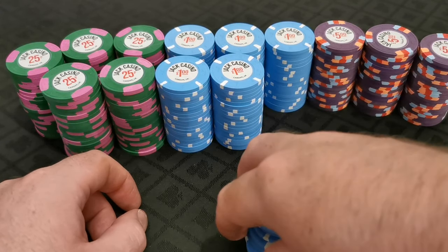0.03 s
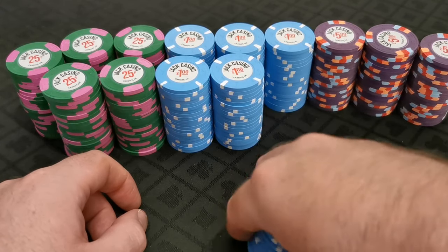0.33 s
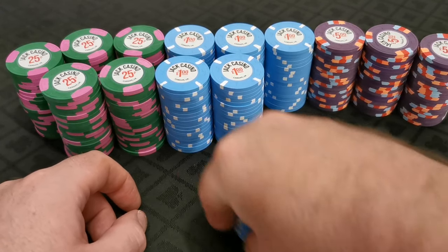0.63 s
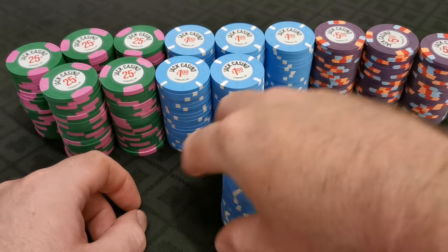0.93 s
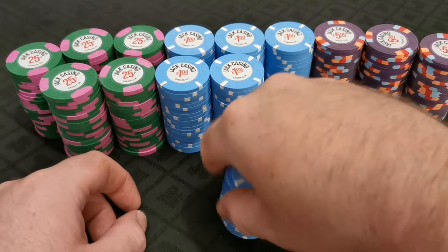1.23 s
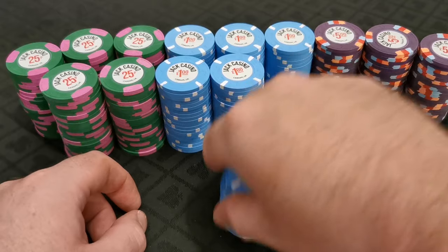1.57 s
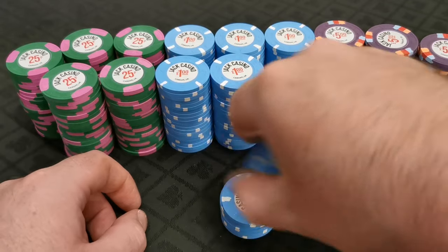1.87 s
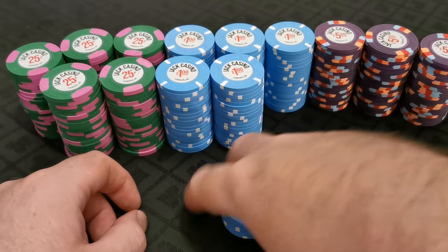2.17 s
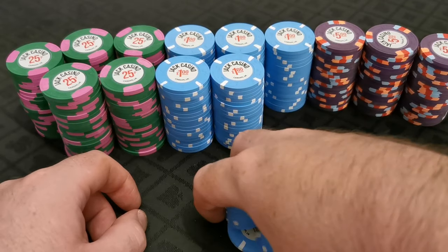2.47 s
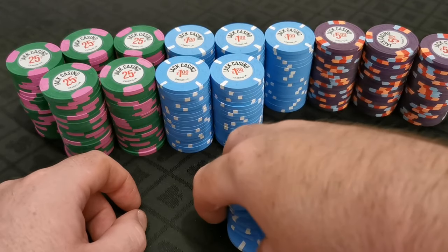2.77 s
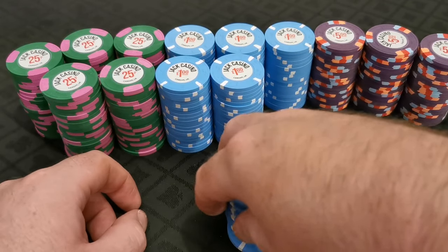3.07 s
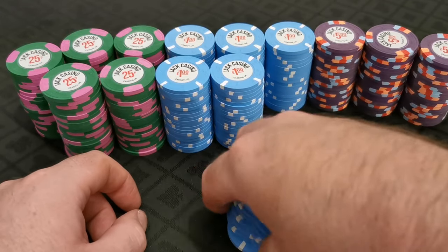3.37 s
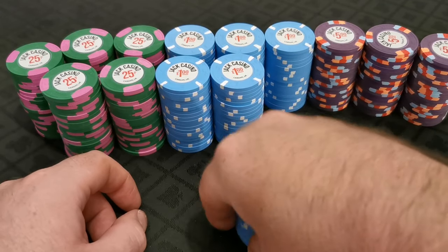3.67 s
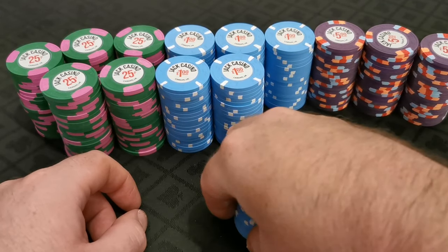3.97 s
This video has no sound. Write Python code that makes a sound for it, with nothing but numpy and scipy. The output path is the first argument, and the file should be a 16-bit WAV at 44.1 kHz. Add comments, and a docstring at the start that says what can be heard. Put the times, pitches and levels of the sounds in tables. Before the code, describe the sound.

Clay poker chips clicking and chattering as a hand cuts and restacks them on felt.

```python
"""Clay poker chips are cut and restacked by hand on a felt-covered table in a small room.
Each impact excites the damped modes of chip and stack: chips clack when they meet face to face
and chatter in many tiny impacts when they slide. Friction of fingers and felt gives bands of
noise, and a stack set down thumps the table. The room reverberates briefly over a faint hum."""
import sys
import numpy as np
from scipy import signal
from scipy.fft import rfft, irfft
from scipy.io import wavfile
from scipy.ndimage import uniform_filter1d

SR = 44100
rng = np.random.default_rng(int(sys.argv[2]) if len(sys.argv) > 2 else 0)


def wrap_up_sound(samples):
    """Save the sound to the file named by the first command line argument, as 16-bit audio."""
    columns = np.atleast_2d(samples).T
    # keep every value between -1 and 1, then stretch to whole-number steps
    tamed = np.clip(columns, -1, 1)
    steps = np.round(tamed * 32767).astype(np.int16)
    wavfile.write(sys.argv[1], SR, steps)


N = 176400
T = np.arange(N) / SR
TABLE_PAN_DB = -4  # pan is always left over right
# Spectrum of friction on felt. Each row: frequency in Hz, relative level in dB.
FELT_SPECTRUM = [(30, -10), (160, -12.5), (320, 0), (1200, -5), (16000, -65)]


def from_db(db):
    """Amplitude ratio of a level in decibels."""
    return 10 ** (np.asarray(db) / 20)


def unit_rms(x):
    """Normalisation to a mean power of one."""
    return x / np.sqrt(np.mean(x ** 2) + 1e-20)


def at_hz(points, hz):
    """Interpolation on a log-frequency axis."""
    p = np.array(points)
    return np.interp(np.log(np.maximum(hz, 1)), np.log(p[:, 0]), p[:, 1])


def panned(db):
    """Constant-power panning: left and right gains that differ by db."""
    return unit_rms(from_db([[db / 2], [-db / 2]]))


def add(out, start_s, x):
    """Superposition of x on out from start_s."""
    i = int(start_s * SR)
    x = x[:, max(-i, 0):N - i]
    out[:, max(i, 0):max(i, 0) + x.shape[1]] += x


def levelled(x, span_s):
    """Each channel gets the energy of a unit level held for span_s."""
    return x * np.sqrt(span_s * SR / (np.sum(x ** 2, axis=1, keepdims=True) + 1e-20))


def noise(spectrum):
    """Coloured stereo noise of unit rms, most coherent at long wavelengths."""
    # Each row: frequency in Hz, correlation of left and right.
    coherence = [(30, .95), (125, 0.63), (1000, 0.33), (3000, 0.039)]
    hz = np.arange(N // 2 + 1) * SR / N
    mid, side = rfft(rng.standard_normal((2, N)))
    alike = at_hz(coherence, hz)
    both = np.sqrt(1 + alike) * mid + np.sqrt(1 - alike) * side * [[1], [-1]]
    return unit_rms(irfft(both * from_db(at_hz(spectrum, hz)) * (hz > 15), N))


def stroke(start, peak, end, drop_db=16.5):
    """Exponential growth and decay of a movement, drop_db down at its ends, then faded out."""
    away = np.maximum((peak - T) / max(peak - start, .002), (T - peak) / max(end - peak, .002))
    return from_db(-drop_db * np.minimum(away, 2)) * np.clip((1.2 - away) * 5, 0, 1)


def ring(modes, pitch=1, detune=.025, scatter_db=2):
    """Coupled vibration: as a blow is passed along, each mode swells and then decays."""
    hz, db, swell_s = np.array(modes).T[:, :, None, None]
    count = len(modes)
    path_s = np.abs(rng.normal(0, .0001, (count, 2, 1)))  # each mode's own delay to each side
    t = np.maximum(np.arange(900) / SR - path_s, 0)
    hz = hz * pitch * (1 + detune * rng.standard_normal((count, 1, 1)))
    gain = from_db(db + scatter_db * rng.standard_normal((count, 2, 1))) / np.sqrt(swell_s)
    envelope = gain * t / swell_s * np.exp(-t / swell_s)
    return np.sum(envelope * np.sin(2 * np.pi * (hz * t + rng.random((count, 1, 1)))), axis=0)


def chip_sound(contacts, pitch, body_db, edge_db, pan_db):
    """Modal response: contacts excite the chip, its bright edge tones, the stack and a brief snap."""
    # Modes of chip, edge and stack. Each row: frequency in Hz, level in dB, swell time in seconds.
    chip_modes = [(4824, -6, 0.00033), (5160, -0.5, 0.00054), (5425, -9, 0.00043)]
    edge_modes = [(6360, -4.5, 0.00048), (8650, 0.5, 0.0002), (9570, -5, 0.00047), (10270, -9, 0.00061),
                  (10850, -2.5, 0.00062), (13000, -9.5, 0.000062)]
    stack_modes = [(824, -9, 0.00075), (1410, -9.5, 0.00024), (2210, -1.5, 0.00034), (2694, -9.5, 0.00017),
                   (3710, 0.5, 0.00023)]
    snap_decay_s, snap_above_hz = .0012, 2990
    grip_detune = .036  # overtones differ from chip to chip and with the grip

    def struck(response):
        return levelled(signal.fftconvolve(contacts[None], response, axes=1), span_s=.0013)

    main = ring(chip_modes, pitch)
    snap = rng.standard_normal(main.shape) * np.exp(-T[:main.shape[1]] / snap_decay_s)
    snap = signal.sosfilt(signal.butter(1, snap_above_hz, "high", fs=SR, output="sos"), snap)
    snap_db = -6.5 + (edge_db + body_db) / 2  # strongest for a hard blow on a whole stack
    chip = struck(main) + from_db(snap_db) * struck(snap)
    edge = from_db(edge_db) * struck(ring(edge_modes, detune=grip_detune))
    body = from_db(body_db) * struck(ring(stack_modes, detune=grip_detune))
    return chip * panned(pan_db) + edge * panned(pan_db / 2 - 6) + body * panned(pan_db / 2 - 5.5)


def slides(chips=5, catches_per_s=800, felt_db=-21.5):
    """Stick-slip friction: chips catch on each other in tiny knocks as the stack drags on felt."""
    # Each row: start, peak and end in seconds, level in dB, relative stack and edge levels in dB,
    # pan in dB.
    moves = [(-.03, 0.004, 0.021, -43.5, -11.5, -17, -5), (0.031, 0.084, 0.18, -38.5, -9.5, -8, -4),
             (0.182, .19, 0.23, -33.5, -15, -5, -4.5), (0.493, 0.507, 0.57, -38.5, -3.5, -7, 2.5),
             (.65, 0.661, .68, -46, 2, -5, -9), (2.718, 2.755, 3, -58.5, 5.5, -14, -23),
             (3.054, 3.077, 3.12, -40.5, -4.5, -7, -2), (3.326, 3.335, 3.35, -36, -19, -15, -1),
             (3.366, 3.38, 3.42, -41.5, -19, -10, 9), (3.546, 3.569, 3.613, -45, -8, -8.5, 1),
             (3.857, 3.886, 3.915, -33, -6, -5, -1)]
    out, drag = np.zeros((2, N)), np.zeros(N)
    for start, peak, end, db, body_db, edge_db, pan_db in moves:
        force = from_db(db) * stroke(start, peak, end, drop_db=9)
        moving = np.flatnonzero(force)
        chatter = 0
        for _ in range(chips):
            chance, size, sign = rng.random((3, N // 4))[:, :len(moving)]
            strength = from_db(-1.5 * np.log(size + .02)) * np.sign(sign - .5)
            catches = (chance < catches_per_s / chips / SR) * strength
            pitch = 1 + rng.normal(0, .049)
            chatter += chip_sound(catches, pitch, body_db, edge_db, pan_db)[:, :len(moving)]
        out[:, moving] += unit_rms(chatter) * force[moving]
        drag += force
    return out + from_db(felt_db) * drag * noise(FELT_SPECTRUM) * panned(TABLE_PAN_DB)


def clacks(rebounds_per_s=3000, rebound_db=-10, graze_db=-14, graze_s=.0016):
    """Impact with rebound: edges graze, the faces meet, and micro-contacts follow as a chip settles."""
    # Each row: time in seconds, level in dB, relative stack and edge levels in dB, pan in dB,
    # chatter length in milliseconds, ring frequency in Hz.
    impacts = [(0.0346, -26, -8.5, -8.5, 0.5, 3.7, 5020), (0.0441, -31, -21, 0.5, 6, 1.5, 5200),
               (0.0617, -26, -20.5, -2, 9, 2.5, 5330), (0.1003, -18.5, -15, -2.5, -4, 3.5, 5100),
               (0.1564, -28.5, -14, -4, -1, 1.8, 5040), (.168, -25.5, -10.5, -7.5, -7, 2, 5230),
               (.1844, -21.5, -20, -12, 12, .8, 5180), (0.1973, -26, -15.5, 2, -8.5, 3, 5430),
               (0.3639, -29, -32, -11.5, 0, .4, 5230), (0.373, -34.5, -23, -13, 0, 1, 5030),
               (0.5594, -27, -10, -3, 1, 8, 4710), (0.6627, -29.5, -1, .5, 1.5, 5.5, 4580),
               (1.51, -38.5, -6, -11.5, -2, 1.6, 4910), (1.8134, -25, -13.5, -4, -2, 1, 4890),
               (1.8225, -33, 0, -0.5, 1, 6.8, 4450), (2.2515, -27.5, -12.5, -8, 3.5, 1.24, 4540),
               (2.46, -42.5, 1.5, -13, -3, 2.2, 4782), (2.7088, -30.5, -16, -12, 0, 1.4, 5060),
               (2.7126, -22.5, -6, -7, -1, 2.5, 5050), (2.7363, -28.5, -12, -22, 8, 2, 5050),
               (2.7519, -19.5, -10.5, -13, 6, .92, 5020), (2.779, -21.5, -17, -19.5, -6, .7, 5210),
               (3.02, -33, -3.5, -2.5, -13, 2.5, 5150), (3.033, -35.5, -7, -12, 22, 1.5, 4800),
               (3.2043, -22.5, -18.5, -12, 2, 1.4, 5180), (3.3014, -28.5, -18, -7, 0, 1.86, 5090),
               (3.308, -32.5, -13.5, -22, 2, 1.9, 4900), (3.3206, -28.5, -9, -9, -3, 2, 5100),
               (3.371, -27, -6.5, -4, -6, 2.5, 5000), (3.3822, -26, -21, -21, -4, 3.81, 5130),
               (3.623, -27, -28, -1.5, -3.5, .6, 5080), (3.909, -33, -16, -24, 20, .7, 5000),
               (3.9172, -31, -26, -19, -5, .66, 4900)]
    nominal_hz = 5150  # ring of the unshifted chip modes
    out = np.zeros((2, N))
    lead = N // 500  # samples ahead of the main contact
    age = (np.arange(N // 150) - lead) / SR
    for time_s, db, body_db, edge_db, pan_db, chatter_ms, ring_hz in impacts:
        graze = from_db(graze_db) * np.exp(-np.abs(age) / graze_s)
        rebound = from_db(rebound_db) * (age < chatter_ms / 1000)
        touching = rng.random(len(age)) < rebounds_per_s / SR
        contacts = np.where(age < 0, graze, rebound) * rng.standard_normal(len(age)) * touching
        contacts[lead] = 1
        clack = chip_sound(contacts, ring_hz / nominal_hz, body_db, edge_db, pan_db)
        add(out, time_s - lead / SR, from_db(db) * clack)
    return out


def rubs(rough_db=4, grains_per_s=294):
    """Sliding friction: skin and cloth give a dull, grainy noise with some hiss."""
    # Each row: start, peak and end in seconds, level in dB, relative hiss level in dB.
    moves = [(0.643, 0.754, .93, -52.5, -1.5), (0.974, 1.034, 1.09, -68.5, 4.5),
             (2.24, 2.278, 2.37, -58.5, 6.5), (2.315, 2.355, 2.43, -64, 11),
             (2.409, 2.467, 2.547, -51.5, -8.5), (2.56, 2.622, 2.67, -53, -18),
             (2.89, 2.937, 3.09, -61, -3), (3.737, 3.885, 4, -55.5, 3.5)]
    # Spectra of the dull part and the hiss. Each row: frequency in Hz, relative level in dB.
    body_spectrum = [(30, -20), (130, -6.5), (300, -6), (800, -0.5), (1300, -8), (2300, 6), (3300, -1.5),
                     (4800, -3.5), (7000, -11), (16000, -27)]
    hiss_spectrum = [(30, -63), (2000, -11), (4500, -7.5), (7000, -11), (10000, -12), (15500, -19)]
    body, hiss = noise(body_spectrum), noise(hiss_spectrum)
    grain = unit_rms(uniform_filter1d(rng.standard_normal(N), int(SR / grains_per_s)))
    friction = sum(from_db(db) * stroke(start, peak, end) * (body + from_db(hiss_db) * hiss)
                   for start, peak, end, db, hiss_db in moves)
    return from_db(rough_db * grain) * friction


def thumps():
    """Cushioned impact: stack or hand knocks hollowly through the felt, then the table shudders."""
    # Each row: time in seconds, knock and shudder levels in dB, shudder rise in seconds,
    # knock frequency in Hz.
    landings = [(.663, -44, -47, 0.037, 642), (1.822, -42.5, -55, 0.037, 797),
                (2.586, -55.5, -52, 0.012, 780), (2.71, -44, -48.5, 0.0097, 660),
                (3.305, -53, -60.5, 0.039, 477), (3.371, -51.5, -71, 0.054, 438),
                (3.802, -55, -48, 0.022, 710)]
    # Modes of the knock. Each row: frequency in Hz, level in dB, swell time in seconds.
    knock_modes = [(618, -5, 0.0014), (740, -4, 0.0012), (859, -2.5, 0.0021)]
    # Vibration of the table. Each row: frequency in Hz, relative level in dB.
    shudder_spectrum = [(26, 0), (36, -7.5), (55, -7), (90, -17), (250, -29), (1000, -49.5)]
    nominal_hz = 756  # pitch of the unshifted knock modes
    out, shudder = np.zeros((2, N)), np.zeros(N)
    for time_s, knock_db, shudder_db, rise_s, knock_hz in landings:
        knock = levelled(ring(knock_modes, knock_hz / nominal_hz), span_s=.0057)
        add(out, time_s, from_db(knock_db) * knock * panned(TABLE_PAN_DB))
        age = np.maximum(T - time_s, 0) / rise_s
        shudder += from_db(shudder_db) * np.sqrt(age * np.exp(1 - age))
    return out + shudder * noise(shudder_spectrum)


def drags():
    """Friction on a soft surface: felt murmurs under a pushed stack."""
    # Each row: start, peak and end in seconds, level in dB.
    pushes = [(2.708, 2.71, 2.8, -53), (3.298, 3.375, 3.533, -55.5)]
    envelope = sum(from_db(db) * stroke(start, peak, end) for start, peak, end, db in pushes)
    return envelope * noise(FELT_SPECTRUM) * panned(TABLE_PAN_DB)


def room(x, early_db=-10, early_decay_s=.009, onset_s=.021, crossfeed=.37):
    """Reverberation: early reflections off hand and stacks, then a diffuse tail dying band by band."""
    # Each row: frequency in Hz, time to decay by 60 dB in seconds.
    decay_times = [(1000, 0.35), (5000, 0.51), (10000, .39), (16000, 0.268)]
    # Spectrum of the tail. Each row: frequency in Hz, gain in dB.
    tail_colour = [(2000, -8.5), (5000, -10), (10000, -7), (16000, -9.5)]
    t = T[:N // 6]
    hz = np.arange(len(t) // 2 + 1) * SR / len(t)
    white = rfft(rng.standard_normal((2, len(t))))
    early = rng.standard_normal((2, len(t))) * np.exp(-t / early_decay_s) * (t > .002)
    response = from_db(early_db) * levelled(early, 1 / SR)
    edges_hz = np.geomspace(100, 18000, 14)
    for low, high in zip(edges_hz, edges_hz[1:]):
        centre = np.sqrt(low * high)
        band = irfft(white * (hz >= low) * (hz < high), len(t))
        fade = from_db(-60 * t / at_hz(decay_times, centre)) * np.minimum(t / onset_s, 1)
        response += from_db(at_hz(tail_colour, centre)) * band * fade / np.linalg.norm(fade)
    return signal.fftconvolve(x + x[::-1] * crossfeed, response, axes=1)[:, :N]


def scene(air_db=-66, hum_hz=95.6, hum_db=-74.5):
    """Superposition of direct and reflected sound over quiet air and a steady hum."""
    # Background noise of the room. Each row: frequency in Hz, relative level in dB.
    air_spectrum = [(20, 7), (45, -3.5), (170, -11), (450, -17.5), (750, -13.5), (1500, -21.5),
                    (3200, -22.5), (7000, -33.5), (16000, -30.5)]
    knocks = clacks()
    handling = slides() + rubs() + drags() + thumps()
    off_axis = clacks()  # what each knock radiates in other directions also reaches the walls
    reflected = room((knocks + off_axis) / np.sqrt(2) + handling)
    air = from_db(air_db) * noise(air_spectrum)
    hum = from_db(hum_db) * unit_rms(np.sin(2 * np.pi * hum_hz * T))
    return knocks + handling + reflected + air + hum


def record(dry):
    """Band limiting: a steep low-pass removes the treble above 16 kHz."""
    return signal.sosfilt(signal.ellip(10, .2, 70, 16000, fs=SR, output="sos"), dry)


dry = scene()
out = record(dry)
wrap_up_sound(out)
```